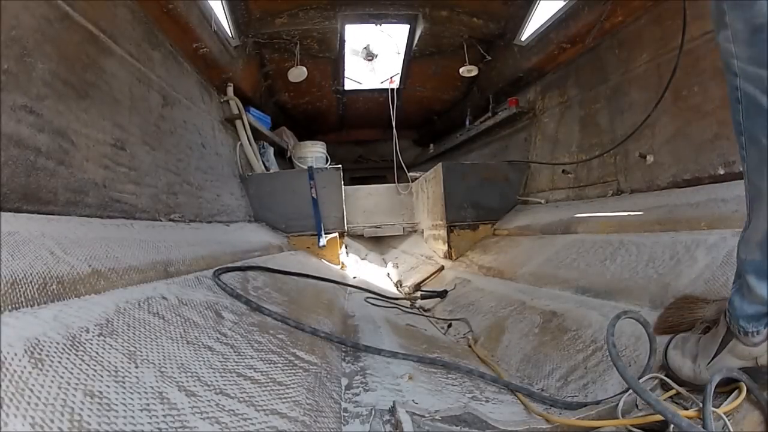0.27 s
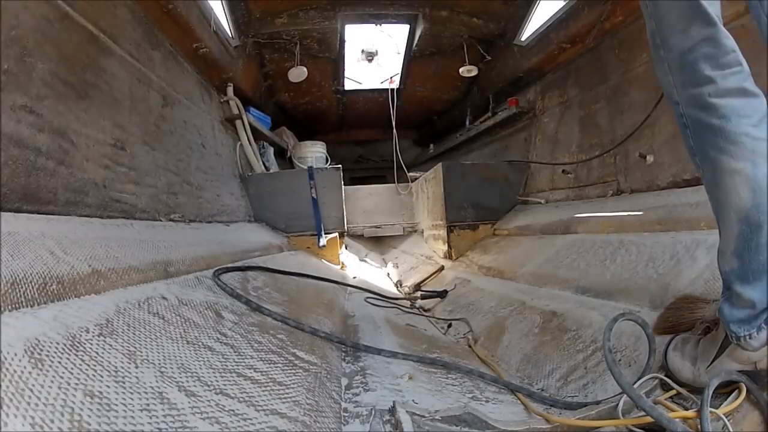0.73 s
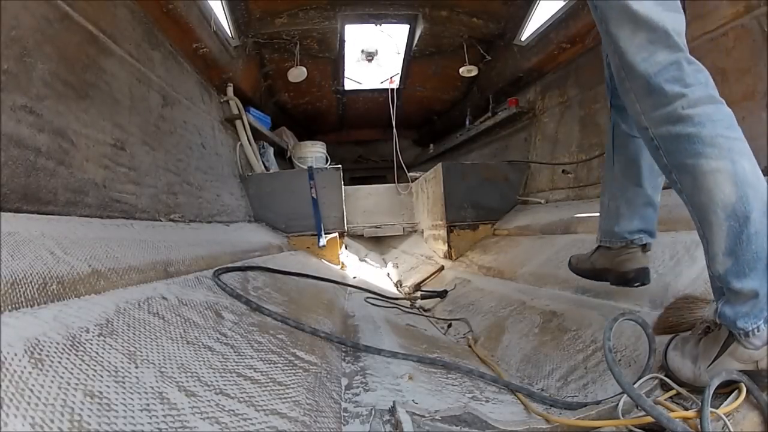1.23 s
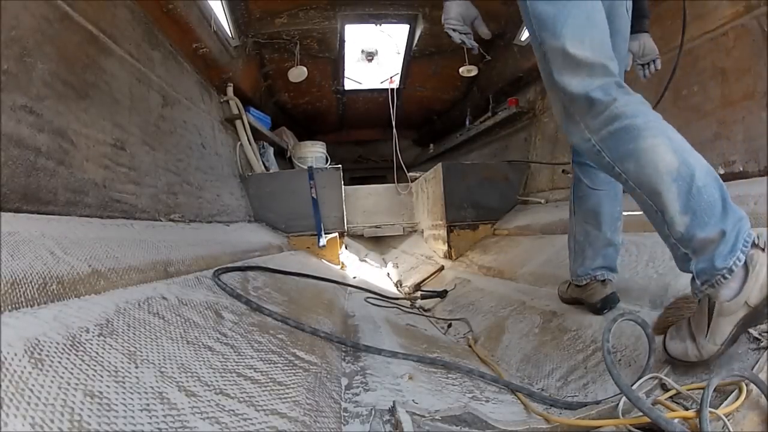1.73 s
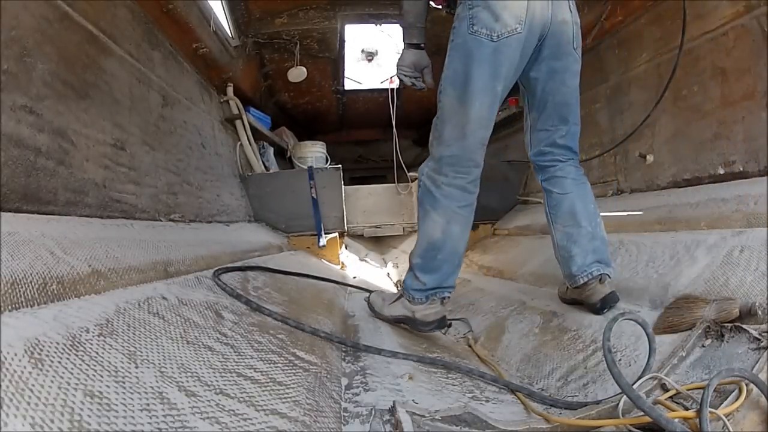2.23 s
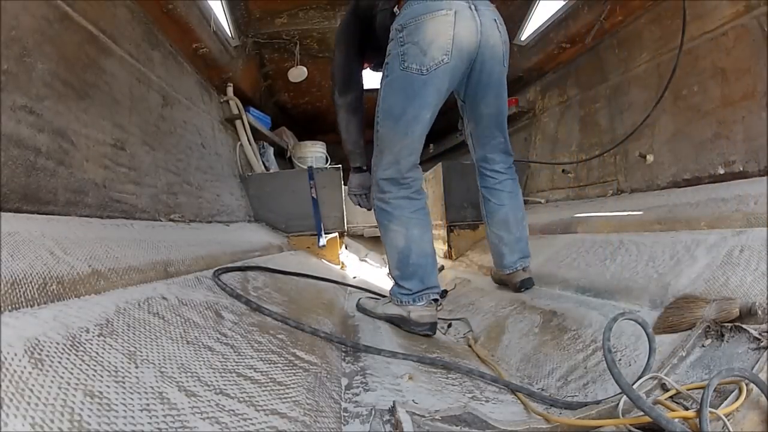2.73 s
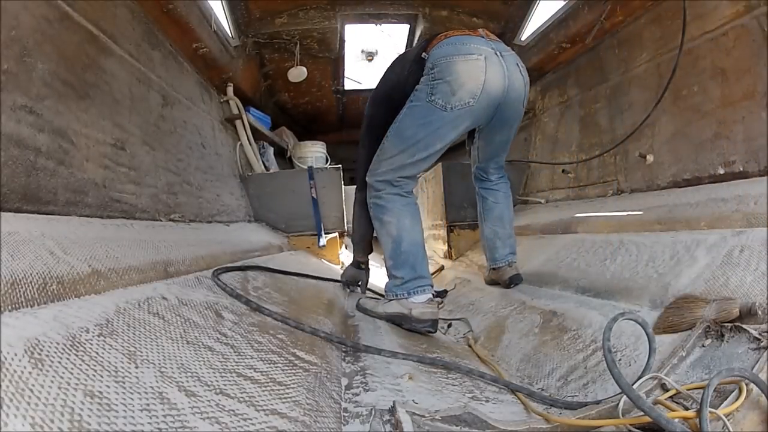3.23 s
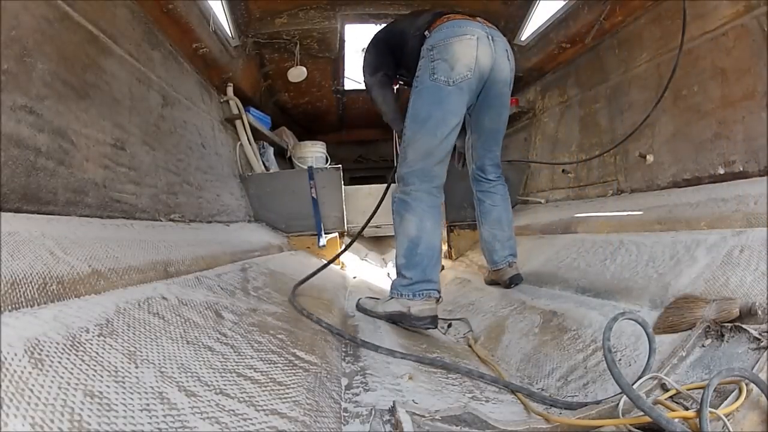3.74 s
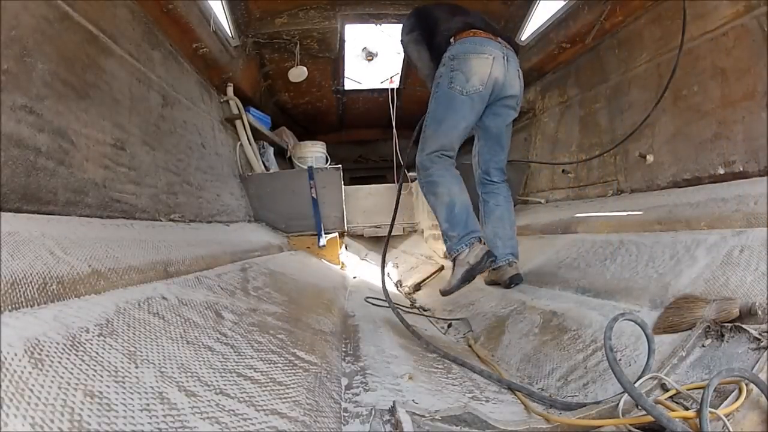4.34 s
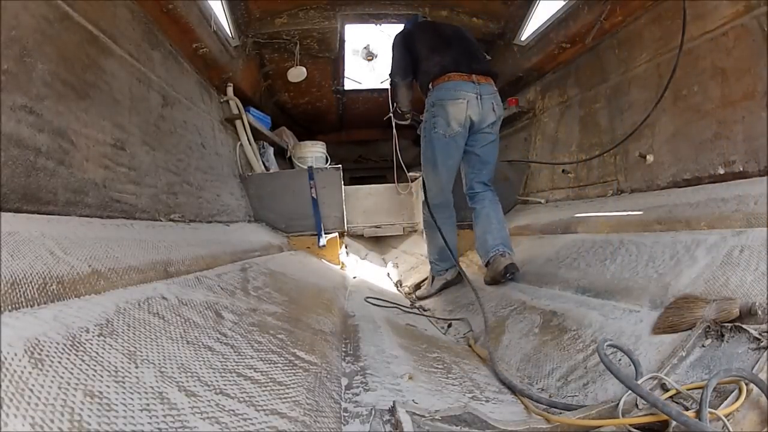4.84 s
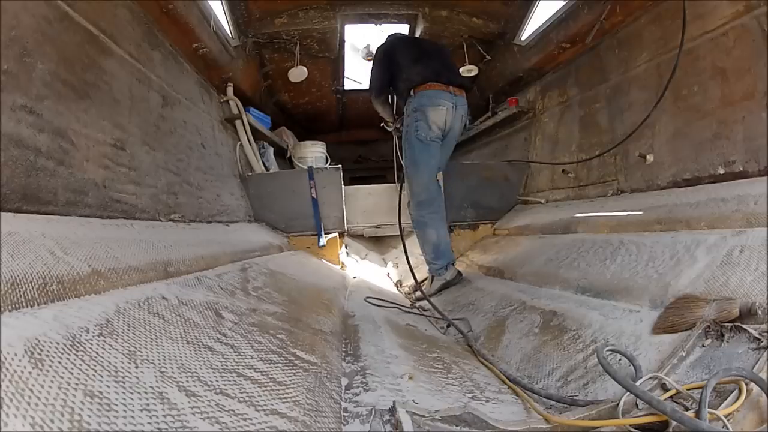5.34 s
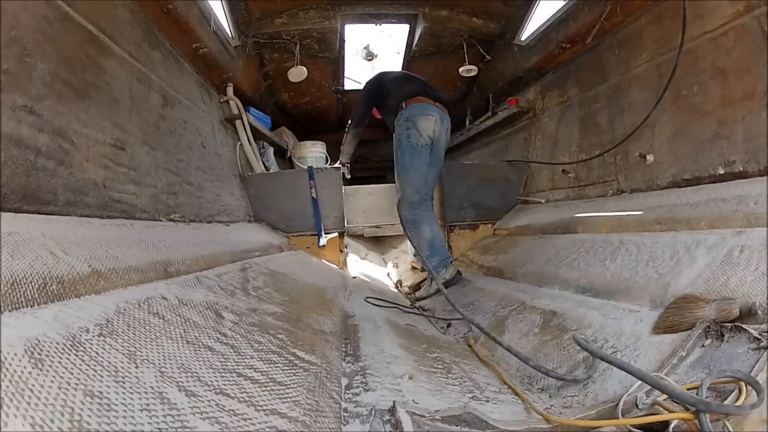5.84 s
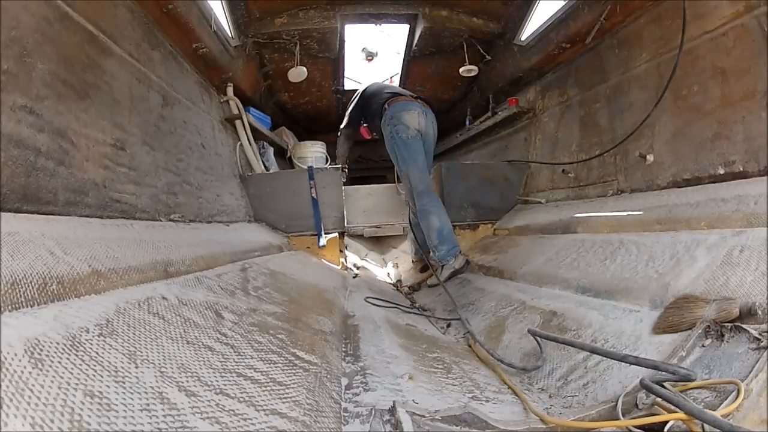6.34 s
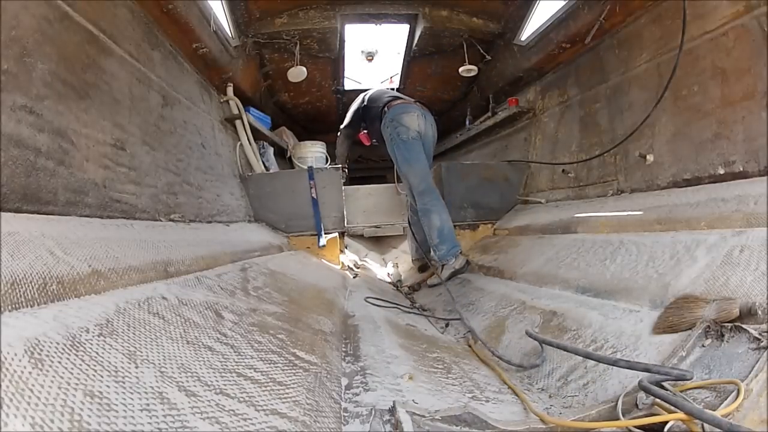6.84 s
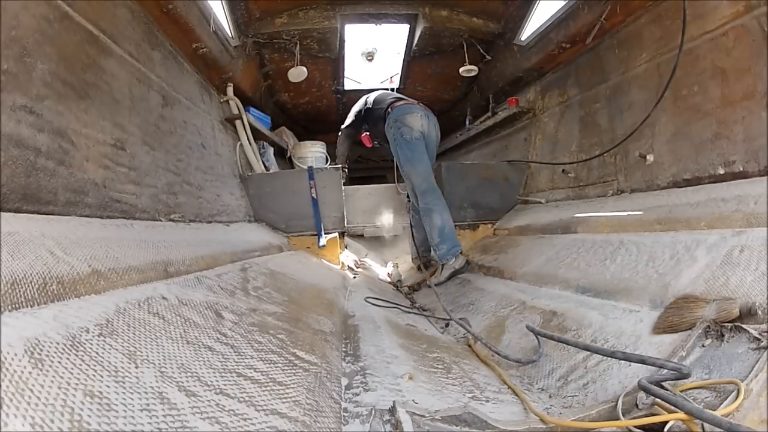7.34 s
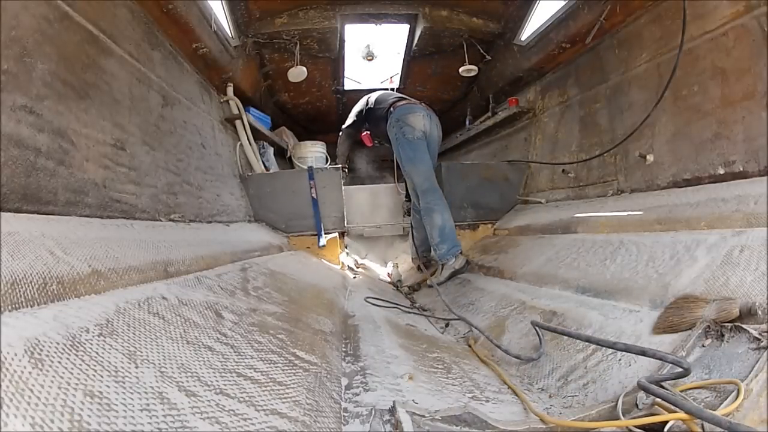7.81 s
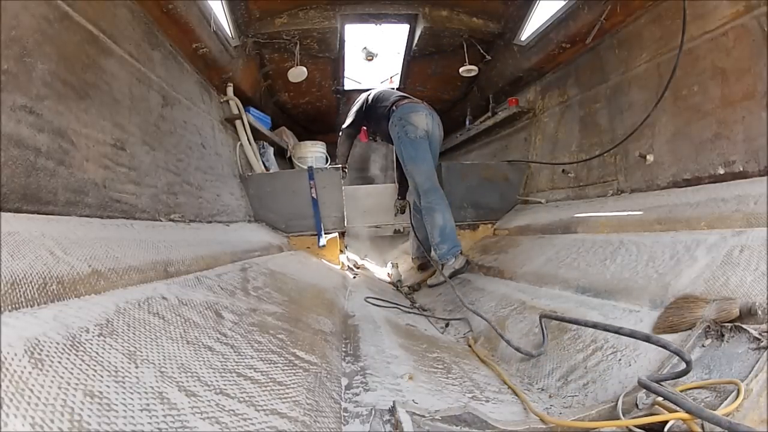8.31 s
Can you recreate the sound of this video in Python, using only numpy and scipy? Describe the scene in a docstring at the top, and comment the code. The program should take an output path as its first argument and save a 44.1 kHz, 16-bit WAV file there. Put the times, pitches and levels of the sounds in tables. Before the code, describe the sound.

Muffled, booming footsteps and a dragged hose inside a boat hull, ending with a faint air tool hiss over low workshop hum.

```python
"""Inside a hollow fiberglass hull in a workshop. Boots step and knock, ringing the panels; an air hose
slaps and scrapes over the laminate, then an air tool starts to hiss and its disc sets the hull humming.
Underneath, shop machines hum and a far, low engine note sinks. We listen from a camera standing on the
hull in a closed case: thumps reach it through the shell, airborne sound only faintly.
It samples coarsely and holds each value, which mirrors the sound into the high treble."""
import sys
import numpy as np
from scipy import signal
from scipy.fft import rfft, irfft, next_fast_len
from scipy.io import wavfile
from scipy.ndimage import uniform_filter1d, map_coordinates

SR = 44100
rng = np.random.default_rng(int(sys.argv[2]) if len(sys.argv) > 2 else 0)


def inscribe(sig):
    """Save sig as 16-bit PCM at rate SR to the path in sys.argv[1].

    A 1-D sig is mono; a 2-D sig holds one channel per row.
    Samples are clipped to [-1, 1] before scaling.
    """
    pcm = np.round(np.clip(np.atleast_2d(sig).T, -1, 1) * 32767)
    wavfile.write(sys.argv[1], SR, pcm.astype(np.int16))


N = 377937

# What rings when struck. Each row: pitch in Hz, relative level in dB, time to fall 60 dB in seconds.
PANEL_MODES = [(121.1, -2, 0.16), (147.1, -5, 0.16), (167.7, 4, 0.14), (188.1, -3.5, 0.24),
               (204.5, -3, 0.066), (235.3, -9, 0.1)]  # the thump of the panel under the camera
BOTTOM_MODES = [(56.9, -10, 0.52), (78.8, 0.5, 0.34), (90, 1, 0.22), (112, 1, 0.38)]  # the boom of the whole hull bottom
KNOCK_MODES = [(288.8, -9, 0.39), (346, -16, 0.14), (356.5, 3, 0.21), (581, -1.5, 0.067),
               (638.7, 3.5, 0.12)]  # the hollow knock of the laminate
CASE_MODES = [(716, -12, 0.05), (926, -15, 0.18), (989.5, 2, 0.046), (1025, 3.5, 0.067), (1095, 1.5, 0.057),
              (1434, -9.5, 0.048), (1530, -5.5, 0.035), (1830, -14, 0.05), (2430, -15, 0.059)]  # the tick of the case and its mount

# Noise colours. Each row: frequency in Hz, relative level in dB.
VENTILATION_EQ = [(25, -13.5), (110, -1), (200, -1.5), (270, -7), (400, -11.5), (600, -16.5), (850, -20.5),
                  (1400, -22.5), (1800, -19.5), (2300, -16.5), (3000, -24.5), (4200, -27.5), (5200, -28),
                  (5800, -35.5)]
FLEX_EQ = [(15, -26), (29, -19), (37, 7), (43, -14), (55, -18.5), (90, -22), (200, -100)]  # the sub-bass of the rocking hull
RUMBLE_EQ = [(40, -47), (62, -3), (80, -1), (100, -12.5), (120, 6), (150, -8.5), (400, -74)]  # the panels' low murmur
RUB_EQ = [(80, -36), (140, -23), (180, 12.5), (205, 1.5), (250, -12.5), (360, -20), (600, -65), (2000, -96)]  # rubbing, heard through the shell
SCUFF_EQ = [(400, -15), (1200, -1.5), (2400, 11), (3500, 4), (6000, -3)]
AIR_JET_EQ = [(300, -5.5), (1000, -0.5), (1500, -6), (2400, 3), (3600, 0.5), (4300, -1.5), (5200, 2.5),
              (5700, -2.5)]
DRONE_EQ = [(120, -27), (185, 4), (205, 0.5), (225, -8), (300, -24), (600, -73)]  # the hull under the tool
SCRAPE_EQ = [(200, 0), (330, 13.5), (450, -10.5), (800, -2.5), (1200, -15.5), (1800, -22), (3000, -33),
             (5500, -53)]  # the hose on the weave

# Peaks and notches on those colours. Each row: centre in Hz, width in Hz, boost or cut in dB.
CASE_LEAKS = [(1051, 147, 9.5), (1564, 63, 4.5), (2086, 88, 8.5), (2330, 41, 5.5), (2617, 190, 7.5),
              (2680, 82, -11.5), (3010, 130, 6.5), (3492, 72, 8), (3707, 225, 5.5), (4730, 240, 2.5),
              (5340, 143, 7)]  # where the case passes or blocks airborne sound
AIR_WHISTLES = [(3540, 55, 10.5), (4730, 90, 6.5), (5245, 51, 8.5)]  # narrow tones in the tool's hiss
SCRAPE_RESONANCES = [(340, 19, 6), (593, 116, 4.5), (633, 67, 16), (953, 92, 8.5), (1030, 91, 11),
                     (1110, 90, 16), (1610, 90, 13.5)]  # what the sliding hose excites

# The hum of the shop machines. Each row: pitch in Hz, level in dB.
MACHINE_HUM = [(120, -66.5), (180, -65.5)]
# Soles and cloth brushing. Each row: peak time in seconds, level in dB, half-width in seconds,
# brightness in dB per octave.
SCUFF_CUES = [(0.729, -62, 0.014, 3), (1.753, -61, 0.019, -11), (2.874, -57, 0.029, 2),
              (3.53, -54, 0.013, -9.5), (3.603, -54, 0.016, -8), (5.775, -56, 0.023, -8),
              (6.258, -62, 0.047, -3), (6.399, -59, 0.04, -10.5), (7.17, -62, 0.058, 7.5)]
# Pulls on the hose. Each row: peak time in seconds, scrape level in dB, half-width in seconds.
HOSE_PULLS = [(3.434, -59.5, 0.07), (3.715, -52, 0.076), (3.848, -52.5, 0.026), (4.035, -49, 0.035),
              (5.986, -64, 0.072), (6.255, -49.5, 0.037), (6.42, -69, 0.051)]
# The hose hitting the hull. Each row: start in seconds, thump peak in dB, skid level in dB.
HOSE_SLAPS = [(3.344, -34.5, -42), (3.407, -30, -40), (3.51, -33.5, -48), (3.651, -50, -45),
              (3.673, -48, -41.5), (3.701, -26, -37), (3.762, -53, -37.5), (3.838, -30.5, -48),
              (3.857, -36.5, -38.5), (4.003, -24.5, -51), (4.016, -28, -38)]
# The hose slides onto a deeper-sounding panel. Each row: time in seconds, panel centre in Hz.
HOSE_PANEL_PATH = [(3.7, 202), (4.05, 167)]
# Full-weight steps. Each row: start in seconds, thump peak in dB, panel centre in Hz, boom in dB,
# sway in dB, heel-to-sole roll in seconds, heel tick force in dB, sole tick force in dB.
FULL_STEPS = [(0.184, -12.5, 164.5, -23, -64, 0.036, -38, -24.5),
              (1.523, -17.5, 156, -24, -38.5, .021, -38.5, -38),
              (2.319, -28.5, 190, -41, -38.5, 0.01197, -42, -58),
              (2.788, -33.5, 166, -33, -47, .036, -51, -55),
              (4.818, -26, 222, -29.5, -42.5, .045, -40.5, -52),
              (5.657, -25, 157, -42.5, -43, .012, -56, -61),
              (6.183, -24.5, 208, -48, -40.5, .021, -43.5, -43.5)]
# Light touches of a toe or boot edge. Each row: start in seconds, thump peak in dB, tick force in dB.
BOOT_TAPS = [(0.21, -18.5, -27.5), (0.714, -47, -44), (0.75, -37.5, -68), (0.841, -32, -68),
             (0.869, -42, -40.5), (1.171, -40, -39), (1.673, -32, -74), (1.738, -34.5, -49.5),
             (3.592, -31.5, -35), (4.044, -24.5, -34), (4.076, -35, -43.5), (4.221, -28.5, -46),
             (4.434, -31.5, -35.5), (4.748, -37.5, -58), (5.036, -30.5, -47), (5.182, -35.5, -43.5),
             (5.806, -40.5, -44.5), (6.027, -31.5, -52), (6.041, -45, -40), (6.252, -29, -43.5),
             (6.333, -47, -44.5), (6.519, -38, -44.5), (7.132, -38, -70.5)]

BAND_HZ, MIRROR_TOP_HZ = 6000, 15300  # the camera's bandwidth; the ceiling of its mirror images


def amp(db):
    """Decibels to gain."""
    return 10 ** (np.asarray(db) / 20)


def add(track, start_s, sound):
    """Mix a sound into the track at its cue."""
    part = track[round(start_s * SR):][:len(sound)]
    part += sound[:len(part)]


def wobble(rate):
    """A smooth random curve through rate points a second."""
    return map_coordinates(rng.standard_normal(int(N * rate / SR) + 4), [np.arange(N) * rate / SR])


def swell(start_s, rise_s, fade_db_per_s):
    """An envelope that eases in and fades at a steady rate."""
    age = np.maximum(np.arange(N) / SR - start_s, 0)
    return (1 - np.exp(-(age / rise_s) ** 2)) * amp(-fade_db_per_s * age)


def bell_curve(peak_s, half_width_s):
    """An envelope that comes and goes evenly around its peak."""
    return np.exp(-0.5 * ((np.arange(N) / SR - peak_s) / half_width_s) ** 2)


def filtered(x, gain):
    """Equalise x with a gain that depends on frequency."""
    size = next_fast_len(N + SR // 2)
    return irfft(rfft(x, size) * gain(np.fft.rfftfreq(size, 1 / SR)), size)[:N]


def noise(eq, peaks=()):
    """Noise of rms 1 within the camera's band, coloured by an EQ curve and resonant peaks."""
    eq_hz, eq_db = np.transpose(eq)

    def gain(hz):
        outline = np.interp(np.log(hz + 1), np.log(eq_hz), eq_db)
        bumps = sum(db / (1 + (2 * (hz - centre) / width) ** 2) for centre, width, db in peaks)
        return amp(outline + bumps) * (hz < BAND_HZ)

    coloured = filtered(rng.standard_normal(N), gain)
    return coloured / np.sqrt(np.mean(coloured ** 2) + 1e-20)


def steadied(x, span_s):
    """Compress the swells of a narrow noise."""
    power = np.abs(uniform_filter1d(x ** 2, int(span_s * SR)))
    return x / np.sqrt(power + 0.078)


def tone(hz, drift_hz, waver_db):
    """A slightly unsteady sine of about rms 1."""
    level = np.sqrt(2) * amp(waver_db * wobble(4))
    return level * np.sin(2 * np.pi * np.cumsum(hz + drift_hz * wobble(5)) / SR)


def ring(modes, scatter_db, attack_s):
    """Damped modes of peak 1, freshly balanced for each point of contact."""
    t = np.arange(SR // 2) / SR
    ringing = sum(amp(db + scatter_db * rng.standard_normal() - 60 * t / t60)
                  * np.sin(2 * np.pi * hz * t) for hz, db, t60 in modes)
    ringing *= 1 - np.exp(-(t / attack_s) ** 2)
    return ringing / np.abs(ringing).max()


def far_engine(high_hz=133, idle_hz=64.6, midway_s=1.27, slowing_s=0.99):
    """A faint low note, like an engine outside, sinks toward idle and fades."""
    t = np.arange(N) / SR
    hz = idle_hz + (high_hz - idle_hz) / (1 + np.exp((t - midway_s) / slowing_s))
    level = amp(-56.5) * bell_curve(peak_s=2.5, half_width_s=1.54)
    return level * tone(hz, drift_hz=0.66, waver_db=1.5)


def workshop():
    """The room tone: machine hum, and ventilation leaking through the case."""
    hum = sum(amp(db) * tone(hz, drift_hz=0.588, waver_db=0.5) for hz, db in MACHINE_HUM)
    ventilation = amp(-57.5 + 0.46 * wobble(2.72)) * noise(VENTILATION_EQ, CASE_LEAKS)
    return hum + ventilation


def hull_murmur(still_s=6.13, calm_db_per_s=6.5, calm_db=8.5):
    """Steps rock the hull, soles and hose rub it; its murmur sinks once the walker stands still."""
    t = np.arange(N) / SR
    stir = amp(-np.clip((t - still_s) * calm_db_per_s, 0, calm_db))
    sway_power = sum((amp(sway_db) * swell(start, rise_s=0.057, fade_db_per_s=22.5)) ** 2
                     for start, _, _, _, sway_db, *_ in FULL_STEPS)
    sole_rub = amp(-49) * sum(swell(start, rise_s=0.05, fade_db_per_s=36.5) for start, *_ in FULL_STEPS)
    hose_rub = amp(12.5) * hose_slide()
    flex = np.hypot(amp(-56.5) * stir, np.sqrt(sway_power)) * steadied(noise(FLEX_EQ), span_s=0.32)
    rumble = amp(-59) * stir * steadied(noise(RUMBLE_EQ), span_s=0.059)
    rub = np.hypot(amp(-58.5) * stir, sole_rub + hose_rub) * steadied(noise(RUB_EQ), span_s=0.1)
    return flex + rumble + rub


def scuffs():
    """Short gritty swishes: dull from soles on dust, brighter from cloth."""
    swishes = np.zeros(N)
    for peak_s, db, half_width_s, tilt_db in SCUFF_CUES:
        colour = [(hz, level + tilt_db * np.log2(hz)) for hz, level in SCUFF_EQ]
        swishes += amp(db) * bell_curve(peak_s, half_width_s) * noise(colour, CASE_LEAKS)
    return swishes * amp(2.1 * wobble(330))


def air_tool(start_s=6.81, press_s=1.3, full_db=-63, light_touch_db=-4, bite_s=7.13):
    """Rushing air, muffled by the case, grows as the tool bears down; the disc makes the hull hum."""
    pressed = np.clip((np.arange(N) / SR - start_s) / press_s, 0, 1)
    valve = swell(start_s, rise_s=0.08, fade_db_per_s=0)
    flow = valve * amp(full_db + light_touch_db * (1 - pressed) + 0.37 * wobble(38))
    bite = amp(-54.5) * swell(bite_s, rise_s=0.05, fade_db_per_s=11.5)  # the disc meets the laminate
    hum = bite * tone(hz=202.3, drift_hz=0.99, waver_db=1.5)
    hiss = noise(AIR_JET_EQ, CASE_LEAKS + AIR_WHISTLES)
    drone = amp(-1) * steadied(noise(DRONE_EQ), span_s=0.086)
    return hum + flow * (hiss + drone)


def panel_thump(centre_hz, attack_s, focus_db_per_octave=24, cutoff_db_per_octave=55):
    """A soft blow favours the panel modes near its centre and barely reaches those far above it."""
    hz, db, t60 = np.transpose(PANEL_MODES)
    octaves = np.log2(hz / centre_hz)
    loss_db = focus_db_per_octave * np.abs(octaves) + cutoff_db_per_octave * np.maximum(octaves - .25, 0)
    return ring(zip(hz, db - loss_db, t60), scatter_db=5, attack_s=attack_s)


def hose_slide():
    """How hard the hose slides: every pull swells and dies away."""
    return sum(amp(db) * bell_curve(peak_s, half_width_s) for peak_s, db, half_width_s in HOSE_PULLS)


def hose(skid_rise_s=0.0022, skid_t60_s=0.054):
    """Too light to boom, the hose slaps the panel, skids after each slap and scrapes over the weave."""
    slaps, age = np.zeros(N), np.arange(SR // 4) / SR
    friction = hose_slide() * amp(3.1 * wobble(90))
    skid = amp(-60 * age / skid_t60_s) * (1 - np.exp(-(age / skid_rise_s) ** 2))
    for start, thump_db, skid_db in HOSE_SLAPS:
        centre_hz = np.interp(start, *np.transpose(HOSE_PANEL_PATH))
        add(slaps, start, amp(thump_db) * panel_thump(centre_hz, attack_s=0.011))
        add(friction, start, amp(skid_db) * skid)
    return slaps + friction * noise(SCRAPE_EQ, SCRAPE_RESONANCES)


def edge_tick(force_db, grit_db=-0.5, grit_t60_s=0.031, settle_db=-9):
    """A hard edge crushes grit and rings the case, then touches again as the sole rolls."""
    t = np.arange(SR // 2) / SR
    strike, settle = (ring(CASE_MODES, scatter_db=2, attack_s=0.0025) for _ in range(2))
    touch = strike + amp(grit_db - 60 * t / grit_t60_s) * rng.standard_normal(len(t))
    add(touch, rng.uniform(0.00521, 0.0088), amp(settle_db) * settle)
    cutoff_hz = np.clip(1440 * 2 ** ((force_db + 39) / 22), 1200, 2600)  # harder blows are brighter
    return amp(force_db) * signal.lfilter(*signal.butter(4, cutoff_hz, fs=SR), touch)


def boot_contact(thump_db, centre_hz, boom_db, tick_db):
    """A boot meets the laminate: its weight thumps and booms, its edge ticks, and both knock hollow."""
    force_db = (thump_db + tick_db) / 2
    knock_db = -47.5 + 0.68 * (force_db + 36)  # a middling contact has a force of -36 dB
    # A contact with little knock for its thump lands softly.
    attack_s = np.clip(0.0048 * 2 ** ((thump_db - knock_db - 16.5) / 14), 0.003, 0.011)
    thump = amp(thump_db) * panel_thump(centre_hz, attack_s)
    boom = amp(boom_db) * ring(BOTTOM_MODES, scatter_db=6.5, attack_s=0.008)
    knock = amp(knock_db) * ring(KNOCK_MODES, scatter_db=3, attack_s=0.0035)
    return thump + boom + knock + edge_tick(tick_db)


def footsteps(sole_thump_db=-4.5, sole_boom_db=-9.5, tap_hz=178, tap_boom_db=-21.5):
    """A step lands on the heel and rolls onto the sole with a softer thump; light taps fall between."""
    boots = np.zeros(N)
    for start, thump_db, centre_hz, boom_db, _, roll_s, heel_tick_db, sole_tick_db in FULL_STEPS:
        heel = boot_contact(thump_db, centre_hz, boom_db, heel_tick_db)
        sole = boot_contact(thump_db + sole_thump_db, centre_hz, boom_db + sole_boom_db, sole_tick_db)
        add(boots, start, heel)
        add(boots, start + roll_s, sole)
    for start, thump_db, tick_db in BOOT_TAPS:
        add(boots, start, boot_contact(thump_db, tap_hz, thump_db + tap_boom_db, tick_db))
    return boots


def scene():
    """The mono mix: boots up front, hose and tool behind them, the shop far back."""
    return (footsteps() + hull_murmur() + hose() + scuffs() + air_tool() + workshop() + far_engine())[None]


def record(dry):
    """The camera samples at 12 kHz and holds each value: faint mirror images stand around 12 kHz."""
    band = filtered(dry[0], lambda hz: hz < BAND_HZ)
    coarse = signal.resample_poly(band, 160, 147)[::4]  # up to 48 kHz, then every fourth value
    held = signal.resample_poly(np.repeat(coarse, 4), 147, 160)
    return filtered(held[:N], lambda hz: hz < MIRROR_TOP_HZ)[None]


dry = scene()
out = record(dry)
inscribe(out)
```